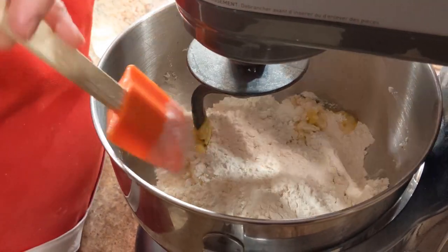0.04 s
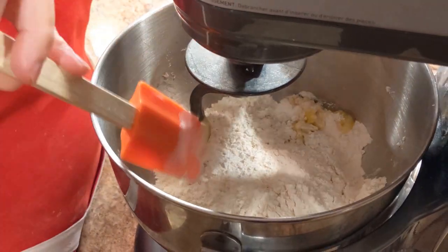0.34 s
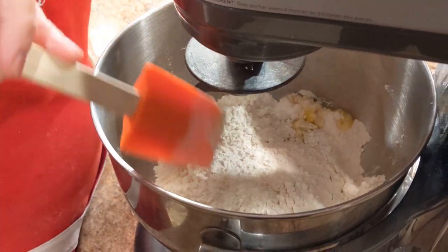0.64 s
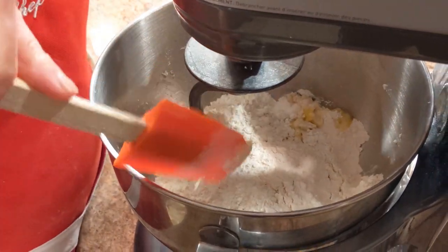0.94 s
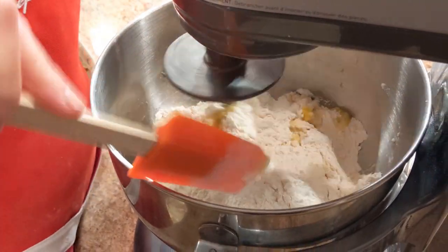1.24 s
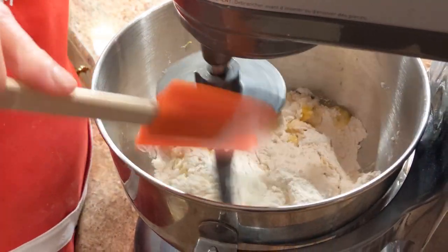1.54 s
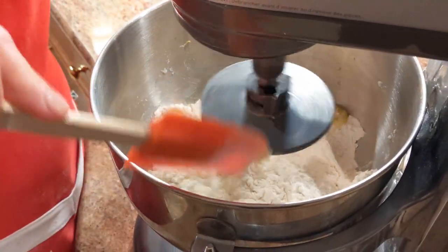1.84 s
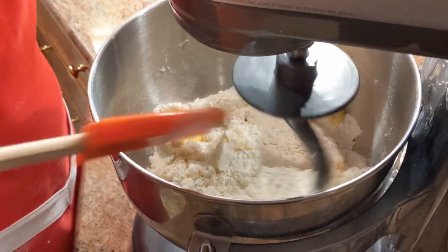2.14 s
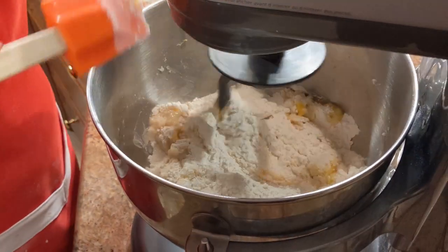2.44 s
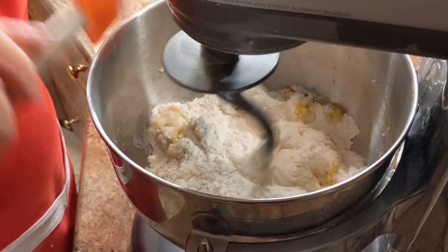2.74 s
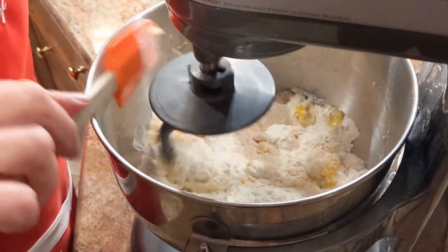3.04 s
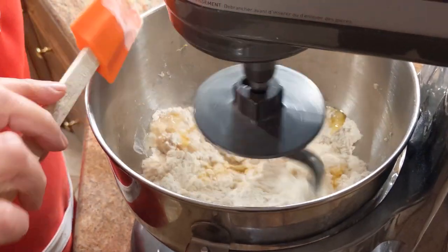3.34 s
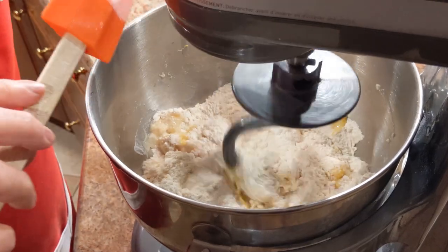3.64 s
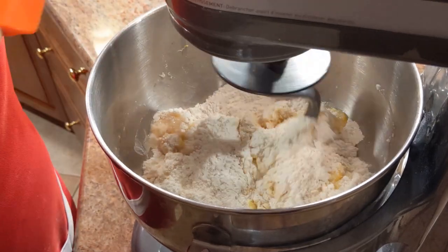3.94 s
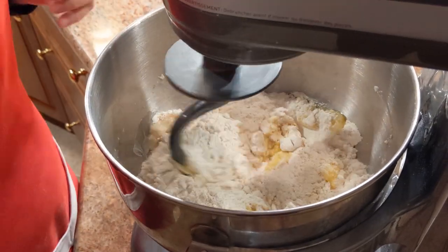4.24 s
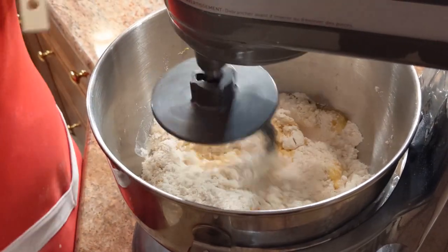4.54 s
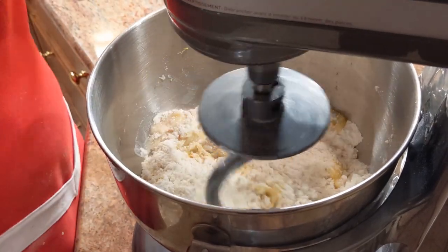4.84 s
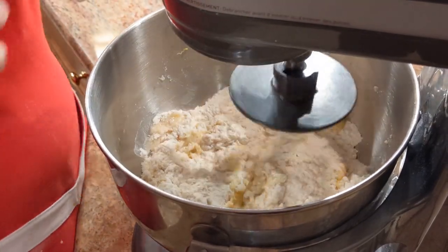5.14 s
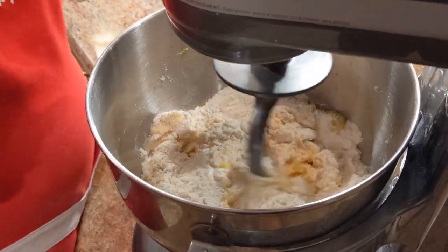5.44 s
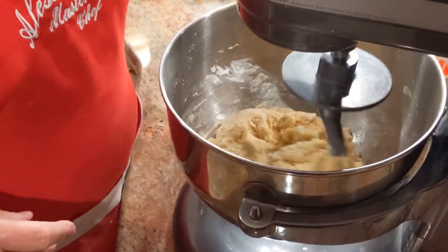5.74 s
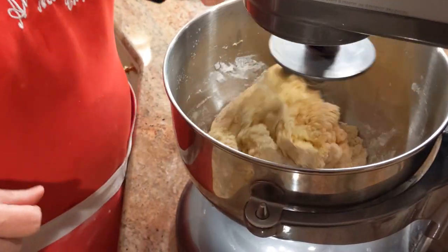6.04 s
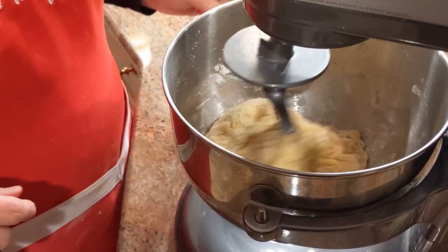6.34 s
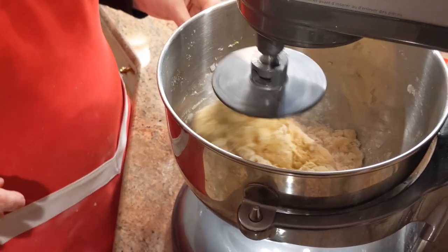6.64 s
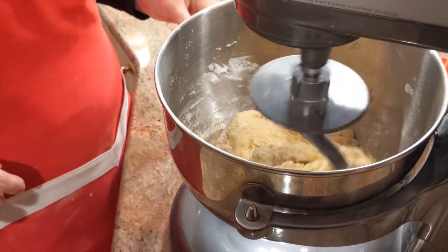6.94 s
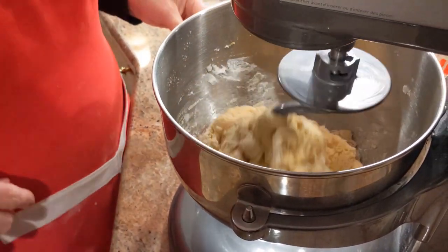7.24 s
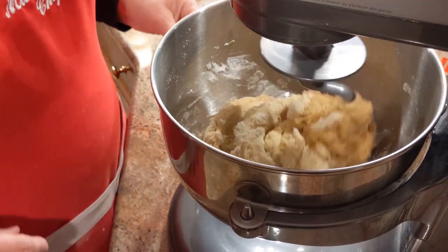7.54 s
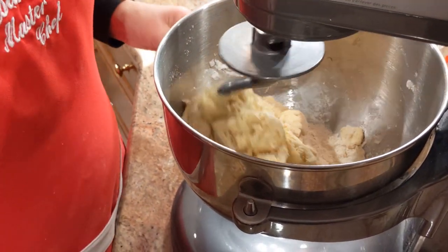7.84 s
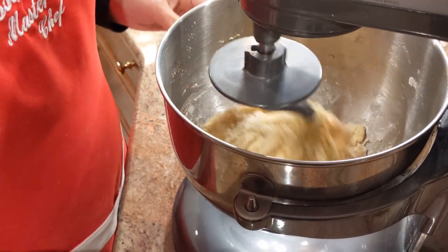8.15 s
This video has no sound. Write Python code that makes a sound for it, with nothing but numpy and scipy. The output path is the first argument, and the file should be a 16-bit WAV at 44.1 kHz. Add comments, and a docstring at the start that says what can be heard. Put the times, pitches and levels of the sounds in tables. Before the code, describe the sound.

A few soft spatula knocks come first, then a stand mixer switches on and runs with a rattling, hissing whir and a thin whine as it stirs flour. The spatula is rapped three times in quick succession. After a very brief silence the mixer is labouring in stiff dough, throbbing and sagging slightly, with faint squeaks against the steel bowl. It is heard close up in a kitchen with a faint low drone.

```python
"""A stand mixer on a kitchen counter starts up and turns its hook through flour; a spatula is knocked about and
rapped three times. The sound cuts out for a quarter second and the scene changes: the mixer labours in stiff,
squeaking dough, sagging at the shoves. A ten-tooth pinion drives a wheel that throbs once a turn, loose teeth
rattle the housing, the armature whines, the brushes hiss and the windings hum. A low kitchen drone lies behind
it all, heard on a stereo microphone whose left side is shaded in the treble."""
import sys
import numpy as np
from scipy import signal
from scipy.fft import rfft, irfft, next_fast_len
from scipy.io import wavfile
from scipy.ndimage import uniform_filter1d

SR = 44100
rng = np.random.default_rng(int(sys.argv[2]) if len(sys.argv) > 2 else 0)


def file_out(sig):
    """Save sig as 16-bit WAV at sys.argv[1]."""
    # one column per channel
    cols = np.atleast_2d(sig).T
    # limit, then scale
    lim = np.clip(cols, -1, 1)
    pcm = np.round(lim * 32767).astype(np.int16)
    wavfile.write(sys.argv[1], SR, pcm)


N = 361179
TIME = np.arange(N) / SR
SWITCH_ON_S, FLOUR_END_S, DOUGH_START_S = .851, 5.347, 5.614
# resonances and notches of housing and bowl: centre_hz, width_hz, lift_db
HOUSING_RESONANCES = [(310, 30, 6), (380, 36, 12), (623, 85, 8.5), (801, 24, 11), (868, 24, 10.5),
                      (940, 33, 6.5), (1030.5, 61, 11), (1204, 110, 6.5), (1323, 17, 8), (1540, 72, 5.5),
                      (1950, 65, 1), (2335, 130, 6), (2740, 34, 13), (3030, 66, 10), (3230, 54, 5),
                      (3813, 72, 5.5), (4074, 44, 11.5), (4460, 150, 1.5), (5160, 130, 3), (5357, 40, 12.5),
                      (6160, 410, 0), (7760, 320, -4.5)]


def mixer(stiff, run_hz, tight_s, rattle_db, brush_db, easing_db_per_s=.84):
    """Gears, armature and brushes run off one shaft; stiff is 0 in flour and 1 in dough."""
    turns = pinion_turns(run_hz, tight_s)
    throb = mesh_tightness(turns)
    # rattle, hiss and tones grow as the motor spins up and follow the strain of the shoves
    strain_db, _ = shoves()
    easing_db = (1 - stiff) * easing_db_per_s * (TIME - SWITCH_ON_S)  # flour gives way as it is stirred
    load_db = rattle_db - 6 * spin_up_lag() + strain_db - easing_db
    friction_db = -22 * spin_up_lag() ** 1.67 + .094 * strain_db
    tones = (gear_mesh(turns, throb, stiff) + armature_whine(turns, stiff)) * undb(1.25 * friction_db)
    tones = at_microphone(tones, undb(-6) * stirred(tones))
    rattle = gear_rattle(turns, throb, stiff) * undb(load_db)
    hiss = brush_hiss(turns, stiff) * undb(brush_db + friction_db)
    return tones + rattle + hiss


def pinion_turns(run_hz, tight_s, start_slow_hz=7.3, governor_s=.148, catch_hz=.12):
    """The pinion spins up, sags at shoves, overshoots as the governor makes up, and catches when tight."""
    _, lost_hz = shoves()
    made_up_hz = np.interp(TIME - governor_s, TIME, lost_hz)
    speed_hz = run_hz - start_slow_hz * spin_up_lag() - lost_hz + made_up_hz
    turns = np.cumsum(speed_hz) / SR
    turns -= np.interp(tight_s, TIME, turns)  # the mesh is tight at tight_s
    return turns - catch_hz * np.cumsum(mesh_tightness(turns)) / SR


def spin_up_lag(decay_s=.17):
    """How far the motor still is from full speed: 1 at switch-on, dying away to 0."""
    return np.exp(-np.maximum(TIME - SWITCH_ON_S, 0) / decay_s)


def shoves():
    """Each shove builds up and lets go; gives the change in rattle (dB) and the speed lost (Hz)."""
    # the hook meets a heap of flour or a lump of dough: peak_s, length_s, rattle_db, lost_hz
    lumps = [(1.7, .5, 1, 0), (4.903, 0.15, 2.2, 0), (5.764, 0.15, 2, 0.109), (5.937, .1, .5, .3),
             (6.431, .3, 4, .6), (6.85, 0.19, 0.5, 0), (7.047, 0.074, 0.5, .2), (7.176, 0.19, 2, 0),
             (7.344, .1, -1, 0.74), (7.675, .1, -2.5, .5), (7.837, 0.073, 6, .6), (7.983, .06, 2, 0.22),
             (8.173, 0.072, 0.5, 1)]
    peak_s, length_s, rattle_db, lost_hz = np.transpose(lumps)
    push = np.exp(-(2 * (TIME[:, None] - peak_s) / length_s) ** 2)
    return push @ rattle_db, push @ lost_hz


def mesh_tightness(turns):
    """The wheel runs slightly off centre, so the mesh tightens once in six pinion turns."""
    return np.cos(2 * np.pi * turns / 6)


def gear_mesh(turns, throb, stiff):
    """Meshing teeth sing; under a stiff load they shake and the throb moves up into the overtones."""
    # mesh tones: cycles_per_turn of the pinion
    orders = (9, 10, 11, 20, 30, 40, 50)
    # strength of each tone: flour_db, dough_db
    levels = [(-61, -68), (-46.5, -56), (-59, -63), (-67, -53), (-65, -52), (-63, -56), (-62, -57)]
    return shaft_tones(turns, orders, np.array(levels)[:, stiff],
                       waver_db=.7 + 1.1 * stiff, wobble_rad=.12 + .9 * stiff,
                       swell_db=lambda order: throb * (order / 6.5 if stiff else 2.8))


def armature_whine(turns, stiff):
    """The spinning armature whines at high multiples of the pinion speed."""
    # whine tones: cycles_per_turn of the pinion
    orders = (12, 16, 48, 54, 60, 72, 84, 96, 103, 106, 111, 139)
    # strength of each tone: flour_db, dough_db
    levels = [(-63.5, -56), (-64.5, -68), (-55.5, -93), (-57.5, -58), (-61, -70), (-76, -57),
              (-56.5, -60.5), (-46, -75), (-68.5, -53), (-70, -79), (-69, -68), (-63.5, -81)]
    return shaft_tones(turns, orders, np.array(levels)[:, stiff], waver_db=2.3, wobble_rad=.41)


def shaft_tones(turns, orders, levels, waver_db, wobble_rad, swell_db=lambda order: 0):
    """Tones locked to the shaft; each wavers in level and phase and may swell by its own amount."""
    tones = 0
    for order, level_db in zip(orders, levels):
        phase = 2 * np.pi * (order * turns + rng.random()) + wobble_rad * walk(25)
        gain = undb(level_db + waver_db * walk(14) + swell_db(order))
        tones = tones + np.sqrt(2) * gain * np.sin(phase)
    return tones


def gear_rattle(turns, throb, stiff, teeth=10, spread_db=4.5, wear_db=.69, jitter_s=.0004, grind_db=-1):
    """Each tooth lands with its own force, a little early or late; greased flanks grind in between."""
    # colour of the rattle: frequency_hz, flour_db, dough_db
    spectra = [(50, -35, -18), (132, -22, -39), (200, -8.5, -4.5), (360, -2, -7.5), (498, 0, 0.5),
               (530, -14.5, -13), (649, -2, -5.5), (890, -1, 1.5), (1100, -1.5, -3), (1390, 1, -3),
               (2150, -0.5, -6), (3220, -14, -15), (8000, -50.5, -20)]
    hits = np.flatnonzero(np.diff(np.floor(teeth * turns)))
    wear = rng.standard_normal(teeth)
    strength, timing, polarity = rng.standard_normal((len(hits), 3)).T
    force = undb(spread_db * strength + wear_db * wear[np.arange(len(hits)) % teeth])
    landings = np.clip(hits + (jitter_s * SR * timing).astype(int), 0, N - 1)
    blows = np.zeros(N)
    blows[landings] = force * np.sign(polarity)
    drive = unit(blows) + undb(grind_db) * rng.standard_normal(N)
    stereo = at_microphone(drive, rng.standard_normal((2, N)))
    return through_housing(stereo, spectra, stiff) * undb(.9 * throb * (1 + stiff))


def brush_hiss(turns, stiff, flicker_db=.5, echo_s=.0031, echo_db=-10):
    """Carbon brushes rub the commutator: hiss that pulses twelve times and twice a pinion turn."""
    # colour of the hiss: frequency_hz, flour_db, dough_db
    spectra = [(600, -48, -23.5), (2010, -8, -10.5), (2620, -11.5, -15), (3430, -5, -13.5),
               (3760, -4, -5.5), (4630, 0, -1.5), (5000, -6, -5.5), (5630, -4, -4.5), (6030, -8.5, -14.5),
               (9220, -10, -14), (10160, -4, -11.5), (11450, -11, -9), (13370, -2.5, -12),
               (15100, -10.5, -14.5)]
    pressure = 1 + .097 * np.cos(2 * np.pi * 12 * turns) + .043 * np.cos(2 * np.pi * 2 * turns)
    rub = rng.standard_normal((3, N)) * pressure * undb(flicker_db * walk(150))
    # an echo off the bowl ripples the spectrum
    rub = filtered(rub, lambda hz: 1 + undb(echo_db) * np.exp(-2j * np.pi * hz * echo_s))
    return through_housing(at_microphone(rub[0], rub[1:]), spectra, stiff)


def through_housing(noise, spectra, stiff):
    """Noise takes its flour or dough colour and rings housing and bowl; comes out at rms 1."""
    return unit(colour(noise, np.array(spectra)[:, [0, stiff + 1]], HOUSING_RESONANCES))


def winding_hum(flour_db=-54, dough_db=-52.5, surge_db=-41.5, surge_s=.15):
    """Chopped mains current shakes the iron at multiples of 120 Hz; it surges at switch-on."""
    phase = 2 * np.pi * 120 * TIME
    hum = undb(-20) * np.sin(phase) + np.sin(2 * phase) + undb(-18) * np.sin(3 * phase)
    surge = undb(surge_db + 1.6 * walk(29.9)) * np.exp(-np.maximum(TIME - SWITCH_ON_S, 0) / surge_s)
    current = undb(np.where(TIME < FLOUR_END_S, flour_db, dough_db)) + surge
    return unit(hum) * current * undb(.97 * walk(19))


def knocks(crack_t60_s=.029, bounce_s=.009, bounce_db=-9.5, room_db=-10, room_t60_s=.24):
    """Spatula, hand and dough knock: each blow rings, cracks briefly and bounces once."""
    # the blows: start_s, thump_db, ring_db, crack_db, crack_top_hz
    blows = [(.002, -42.5, -48.5, -63, 5000), (.192, -43.5, -48, -56, 6500), (0.385, -45.5, -52, -69, 5000),
             (.427, -61, -51, -30.5, 15300), (0.454, -50, -40.5, -50, 6000), (0.772, -47, -60, -57, 12000),
             (1.133, -39, -31, -53, 5000), (1.3, -41.5, -38, -60, 5000), (1.479, -40, -58, -65, 5000),
             (2.689, -31, -21, -25.5, 6720), (2.8803, -26, -19.5, -28, 6460),
             (3.0531, -24.5, -20.5, -20.5, 10600), (3.8, -39, -63, -76, 5000), (4.244, -40, -62, -72, 5030),
             (7.465, -55, -34.5, -60, 5000), (7.669, -59, -30.5, -52, 5000)]
    # modes of the knocked things: pitch_hz, level_db, t60_s
    modes = [(135.3, -5, 0.11), (203, 1, 0.047), (273, -6, .05), (358, -7, 0.17), (438, -6.5, 0.06),
             (630, -11, .08), (867, -1.5, 0.016), (1015, -3.5, 0.054), (1172, -0.5, .1), (1300, -10, 0.037),
             (1540, -6.5, 0.062), (1830, -8, 0.017), (2340, -22, 0.03), (4320, 5.5, .02), (4730, -6, .025),
             (5480, -1.5, 0.027), (6160, 1.5, 0.033), (6640, -7, .025)]
    mode_hz, mode_db, t60_s = np.transpose(modes)
    t = np.arange(SR // 4) / SR
    mode_decay, crack_decay = undb(-60 * t / t60_s[:, None]), undb(-60 * t / crack_t60_s)
    track = np.zeros(N + SR)
    for start_s, thump_db, ring_db, crack_db, top_hz in blows:
        # the sharper the snap, the less it rings the high modes
        ping_db = crack_db - 28 * np.log10(top_hz / 5000)
        blow_db = np.interp(np.log(mode_hz), np.log([300, 900, 1700, 4500]),
                            [thump_db, ring_db, ring_db, ping_db])
        band = signal.butter(2, [.24 * top_hz, top_hz], "band", fs=SR, output="sos")
        for delay_s, contact_db in ((0, 0), (bounce_s, bounce_db)):
            pitch_hz = mode_hz * (1 + .022 * rng.standard_normal(len(modes)))
            weights = undb(mode_db + blow_db) * rng.choice([-1, 1], len(modes))
            ring = weights @ (np.sin(2 * np.pi * pitch_hz[:, None] * t) * mode_decay)
            crack = unit(signal.sosfilt(band, rng.standard_normal(len(t)))) * crack_decay
            onset = int((start_s + delay_s) * SR)
            track[onset:onset + len(t)] += undb(contact_db) * (ring + undb(crack_db - 3) * crack)
    # the knocks carry little below 120 Hz
    direct = signal.sosfilt(signal.butter(2, 120, "high", fs=SR, output="sos"), track[:N])
    near = at_microphone(direct, reflections(direct, t60_s=.02), diffuse_hz=1700)
    return near + undb(room_db) * reflections(direct, room_t60_s)


def dough_groan(start_s=5.7, end_s=5.93, from_hz=225, to_hz=170, level_db=-50):
    """Dough drags on the bowl wall with a short, rough, falling groan."""
    progress = np.clip((TIME - start_s) / (end_s - start_s), 0, 1)
    phase = 2 * np.pi * np.cumsum(from_hz + (to_hz - from_hz) * progress) / SR + walk(64)
    return undb(level_db + 2 * walk(46.15)) * np.sin(np.pi * progress) * np.sin(phase)


def dough_squeaks(level_db=-54, pitches_hz=(850, 1010), wander=.05, rough_rad=.75, patchy_db=4.5):
    """Stiff dough sticks and slips on the steel: two rough, patchy squeaks that follow the shoves."""
    squeaks = 0
    for hz in pitches_hz:
        phase = 2 * np.pi * np.cumsum(hz * (1 + wander * walk(16))) / SR + rough_rad * walk(220)
        squeaks = squeaks + np.sin(phase) * undb(patchy_db * walk(28))
    strain_db, _ = shoves()
    squeaks = unit(squeaks) * undb(level_db + 2.4 * strain_db) * (TIME > DOUGH_START_S)
    return at_microphone(squeaks, stirred(squeaks))


def kitchen(room_db=-55, drone_hz=28.6, drone_db=-55):
    """Soft room tone and the wavering low drone of an appliance."""
    # colour of the quiet kitchen: frequency_hz, level_db
    spectrum = [(15, 3.5), (28, 8.5), (45, -1.5), (70, -8), (140, -7.5), (250, -10), (500, -20),
                (1500, -23.5), (4000, -24.5), (8000, -33), (15000, -26)]
    air = rng.standard_normal((3, N))
    phase = 2 * np.pi * drone_hz * TIME + .5 * walk(4.5)
    drone = np.sqrt(2) * np.sin(phase) * undb(drone_db + 3.4 * walk(6.7))
    room_tone = unit(colour(at_microphone(air[0], air[1:]), spectrum))
    return room_tone * undb(room_db + 2.3 * walk(13)) + drone


def at_microphone(direct, scattered, left_lag_s=.000099, diffuse_hz=1000):
    """Direct sound reaches the left side late; towards the treble more of the sound comes scattered."""
    share = lambda hz: .78 / (1 + (diffuse_hz / hz) ** 2)
    lag_s = np.array([[left_lag_s], [0]])
    straight = filtered(direct, lambda hz: np.sqrt(1 - share(hz)) * np.exp(-2j * np.pi * hz * lag_s))
    return straight + filtered(scattered, lambda hz: np.sqrt(share(hz)))


def stirred(tones):
    """The turning hook keeps shifting the reflections, so tones reach each side with a drifting phase."""
    analytic = signal.hilbert(tones, next_fast_len(N))[:N]
    return np.array([np.real(analytic * np.exp(1j * (side * np.pi / 2 + walk(6)))) for side in (-1, 1)])


def reflections(sound, t60_s):
    """Dense reflections off bowl, counter and cupboards, different on each side of the microphone."""
    t = np.arange(SR // 2) / SR
    tail = rng.standard_normal((2, len(t))) * undb(-60 * t / t60_s)
    tail /= np.sqrt(np.sum(tail ** 2, axis=1, keepdims=True))
    return signal.fftconvolve(sound[None], tail, axes=1)[:, :N]


def colour(sound, spectrum, resonances=()):
    """Filter by a smooth (Hz, dB) spectrum with resonances standing on it."""
    points_hz, points_db = np.transpose(spectrum)

    def response(hz):
        peaks_db = sum(lift / (1 + (2 * (hz - centre) / width) ** 2) for centre, width, lift in resonances)
        return undb(np.interp(np.log(hz), np.log(points_hz), points_db) + peaks_db)
    return filtered(sound, response)


def filtered(sound, response):
    """Apply a response given as a function of frequency."""
    size = next_fast_len(N + 8192)
    hz = np.fft.rfftfreq(size, 1 / SR) + 1e-3
    return irfft(rfft(sound, size) * response(hz), size)[..., :N]


def walk(rate_hz):
    """Random levels held 1 / rate_hz seconds and smoothed twice; spread near 1."""
    hold = max(int(SR / rate_hz), 2)
    steps = np.repeat(rng.standard_normal(N // hold + 1), hold)
    return 1.48 * uniform_filter1d(uniform_filter1d(steps, hold), hold)[:N]


def undb(db):
    """Decibels to gain."""
    return 10 ** (np.asarray(db) / 20)


def unit(sound):
    """Scale to rms 1."""
    return sound / np.sqrt(np.mean(sound ** 2))


def scene():
    """First loose flour; the sound cuts out for a quarter second and the scene changes to stiff dough."""
    in_flour = mixer(stiff=0, run_hz=38.33, tight_s=3.018, rattle_db=-41, brush_db=-35.5)
    in_dough = mixer(stiff=1, run_hz=38.42, tight_s=5.776, rattle_db=-43.5, brush_db=-34.5)
    switched_on = np.clip((TIME - SWITCH_ON_S) / .01, 0, 1)
    machine = (np.where(TIME < FLOUR_END_S, in_flour, in_dough) + winding_hum()) * switched_on
    audible = (TIME < FLOUR_END_S) | (TIME > DOUGH_START_S)
    return (machine + knocks() + dough_groan() + dough_squeaks() + kitchen()) * audible


def record(dry):
    """The microphone's left side is shaded in the treble; both sides fall steeply above 15.9 kHz."""
    # response of the shaded side: frequency_hz, gain_db
    shade = [(1000, 1.5), (5400, 0.5), (8400, 0.5), (10000, -10.5), (12000, -11.5), (13700, -19.5),
             (15500, -9)]
    stereo = np.array([colour(dry[0], shade), dry[1]])
    return signal.sosfilt(signal.ellip(10, .2, 70, 15900, fs=SR, output="sos"), stereo)


dry = scene()
out = record(dry)
file_out(out)
```